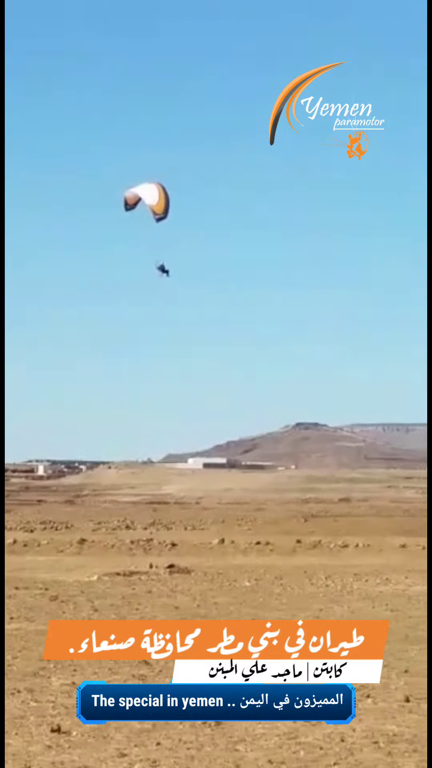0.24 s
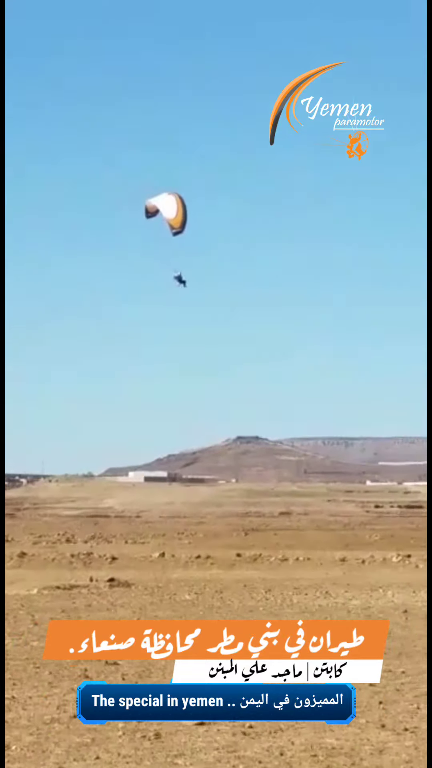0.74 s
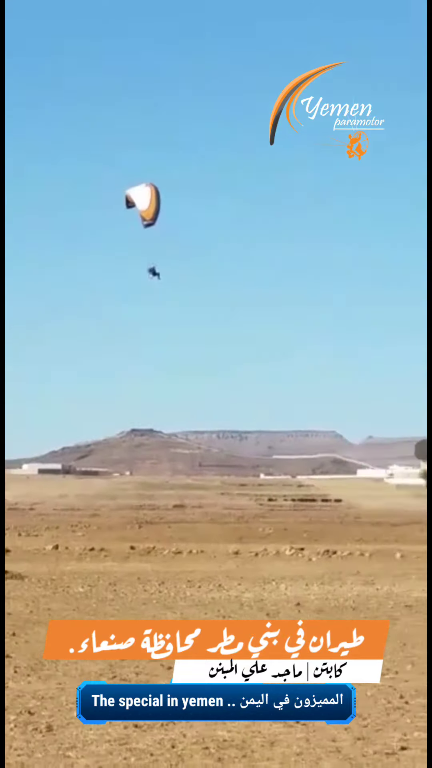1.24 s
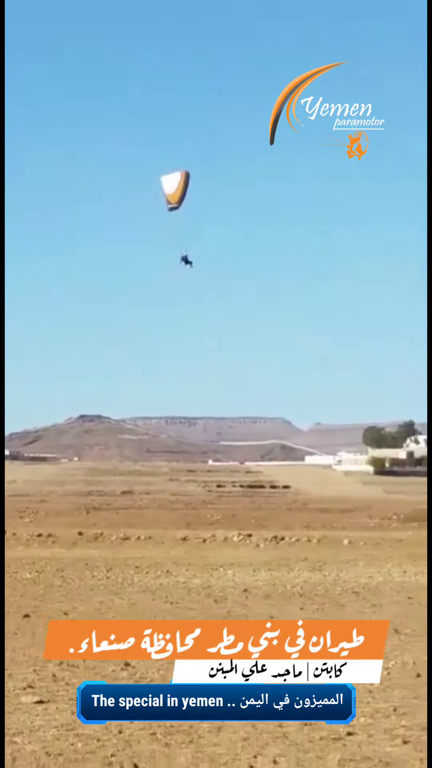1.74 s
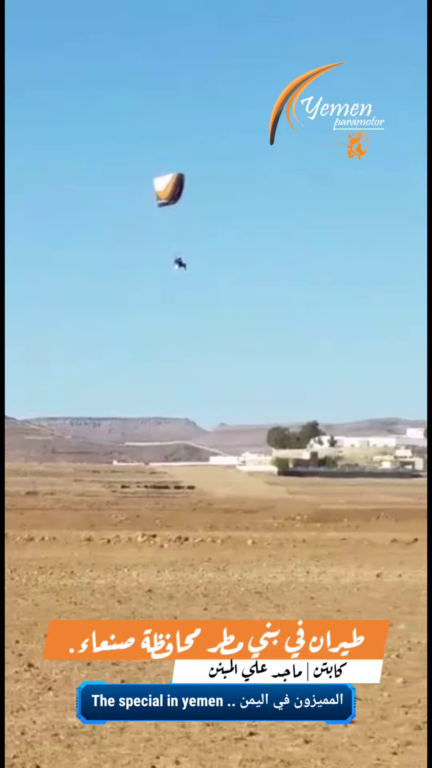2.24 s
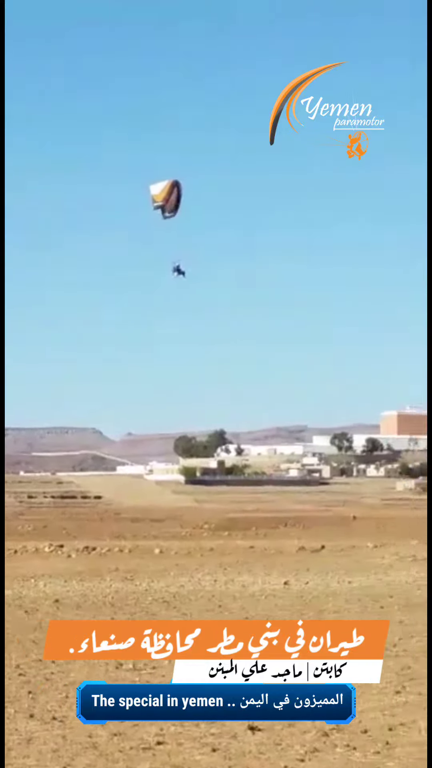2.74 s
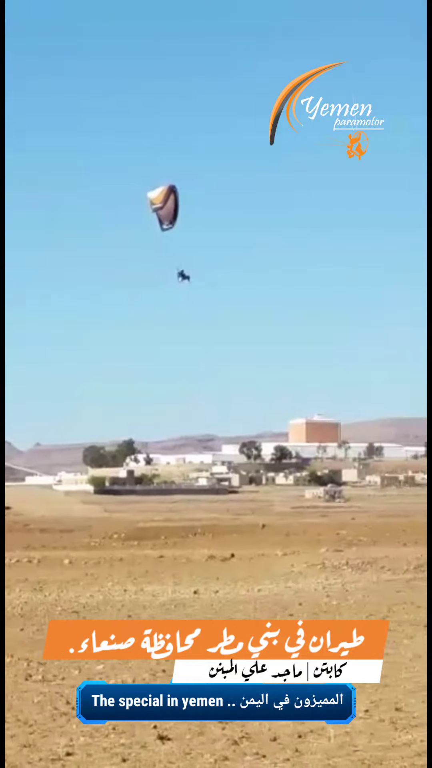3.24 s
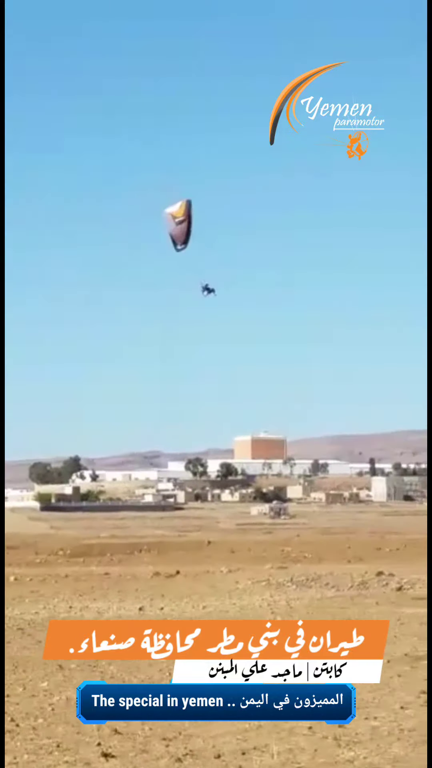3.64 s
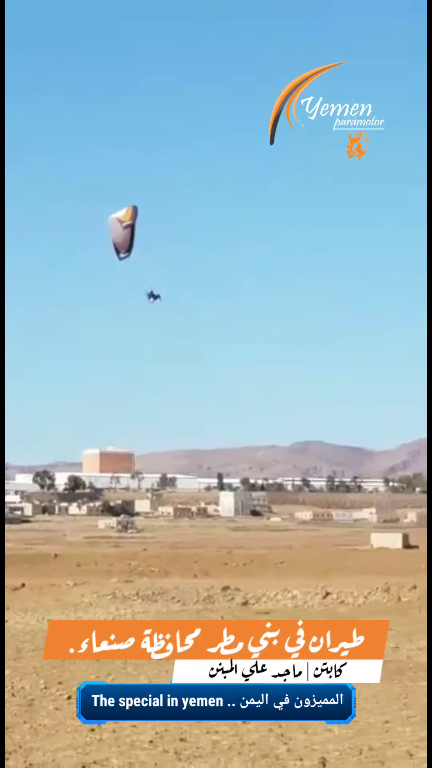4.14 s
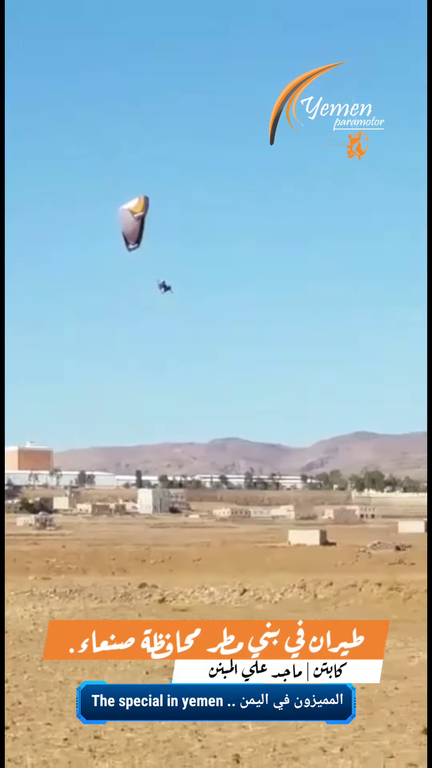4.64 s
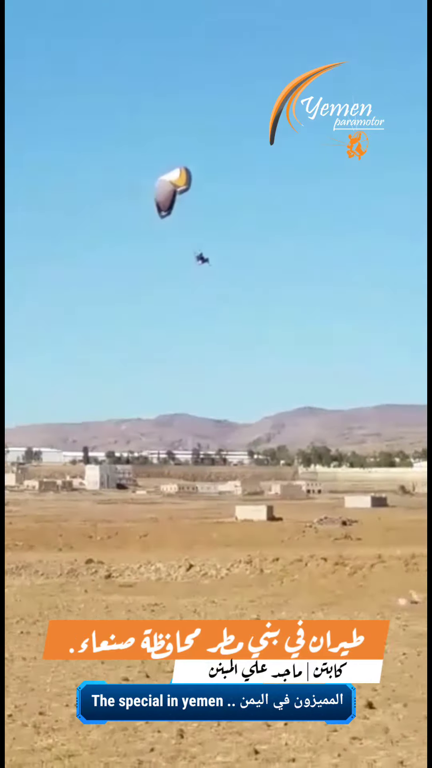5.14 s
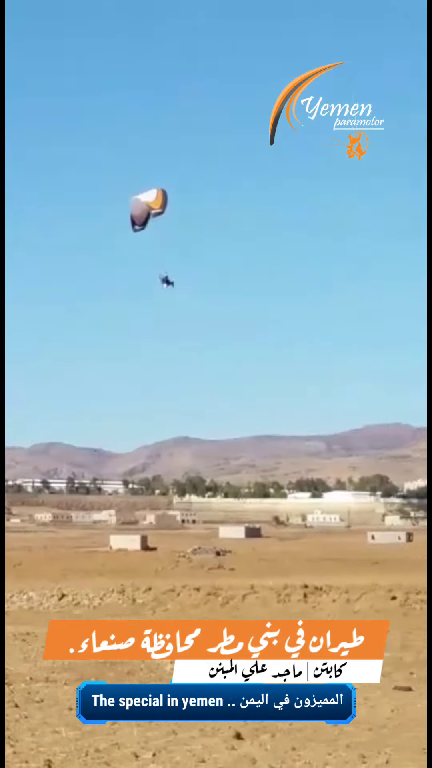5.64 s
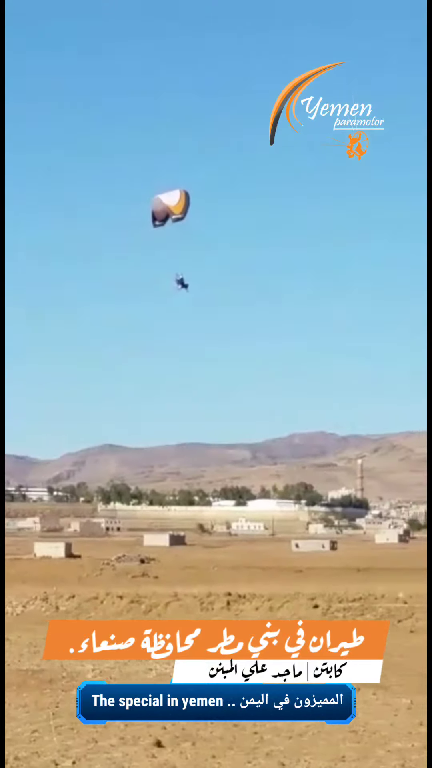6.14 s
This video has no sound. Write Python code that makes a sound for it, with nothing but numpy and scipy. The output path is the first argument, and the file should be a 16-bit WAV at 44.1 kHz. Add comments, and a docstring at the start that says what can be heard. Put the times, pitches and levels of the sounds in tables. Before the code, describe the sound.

Outdoors on open ground, a powered paraglider circles at a distance, its small engine and propeller giving a steady, raspy, fluttering drone. Wind hits a handheld stereo microphone hard on the right side, with dense thumps and flicks at first, scattered bumps in the middle, and a strong burst just before five seconds. The last second is mostly clear engine buzz.

```python
"""A powered paraglider circles over open ground: a two-stroke engine geared down to a two-blade propeller.
Its drone is made of sines at mixtures of blade and firing rates, plus noise that puffs as the blades pass.
Wind thumps on the two microphone ports of a phone, far harder on the right one: filtered noise, short
swings and sharp flicks. The right port also hears an inverted reflection, and faint hiss lies under it all."""
import sys
import numpy as np
from scipy import signal
from scipy.fft import rfft, irfft, next_fast_len
from scipy.io import wavfile
from scipy.ndimage import uniform_filter1d, map_coordinates

SR = 44100
rng = np.random.default_rng(int(sys.argv[2]) if len(sys.argv) > 2 else 0)


def pcm_store(signal):
    """Save signal as 16-bit PCM."""
    levels = np.round(np.clip(np.atleast_2d(signal), -1, 1) * 32767)
    wavfile.write(sys.argv[1], SR, levels.astype(np.int16).T)


N = 282240
T = np.arange(N) / SR  # time in seconds

# Spectrum of the electronic hiss. Each row: frequency in Hz, relative level in dB per Hz.
HISS_SPECTRUM = [(2000, -4.5), (2800, 6.5), (3600, 6.5), (4300, 5.5), (5500, -1), (6200, -21.5),
                 (9800, -34.5), (11500, -4), (13500, 1), (14500, -1)]
# Loudness of the hiss: left and right level in dB.
HISS_LEVELS_DB = [-68.5, -67.5]
# Rising and falling wind on the ports. Each row: time in seconds, left level in dB, right level in dB.
WIND_LEVELS = [(0.0, -30, -9), (0.299, -34, -24.5), (0.678, -37, -18.5), (0.945, -35.5, -16.5),
               (1.251, -41, -17.5), (1.521, -33, -24), (1.84, -38.5, -27.5), (2.002, -36, -22),
               (2.4, -45, -24.5), (2.898, -33.5, -19), (3.338, -34, -20), (3.462, -32.5, -26),
               (3.984, -32.5, -26.5), (4.241, -28.5, -22), (4.481, -37, -30.5), (4.581, -44.5, -39),
               (4.842, -34.5, -18.5), (5.281, -29.5, -24.5), (5.378, -30.5, -33), (5.801, -34, -27.5),
               (5.949, -34, -42.5), (6.4, -43.5, -40.5)]
# Spectrum of wind on the left port. Each row: frequency in Hz, relative level in dB per Hz.
LEFT_WIND_SPECTRUM = [(20, -12), (55, -3), (100, 0), (150, -6), (250, -25), (500, -46), (2000, -90)]
# Spectrum of wind on the right port. Each row: frequency in Hz, relative level in dB per Hz.
RIGHT_WIND_SPECTRUM = [(20, -27), (60, 6), (110, 6.5), (200, -1.5), (320, -10), (420, -23), (550, -23.5),
                       (900, -37.5), (2000, -84.5)]
# Short gusts on the left port. Each row: time of the crest in seconds, level in dB.
LEFT_GUST_EVENTS = [(0.0, -44.5), (0.49, -28), (2.28, -32.5), (2.92, -34), (3.26, -32), (4.88, -25.5),
                    (5.66, -29), (6.38, -35.5)]
GUST_S, FLURRY_S = 0.017, 0.021  # seconds from the crest until the power falls to 1/e
FLURRY_DB = -15  # flurry of eddies round each right bump, relative to the bump's level
# Sharp flicks across the port edge. Each row: time of the onset in seconds, level in dB before the port gain.
FLICK_EVENTS = [(0.026, -10), (0.081, -39), (0.368, -28), (0.421, -23.5), (0.475, -19), (0.588, -23.5),
                (0.64, -27), (0.686, -23.5), (0.754, -25), (0.83, -30), (0.951, -20.5), (0.977, -19),
                (1.065, -21), (1.193, -23.5), (1.254, -27), (1.355, -23), (1.462, -27), (1.545, -28),
                (1.673, -23), (1.752, -35), (2.171, -32), (2.777, -28), (3.052, -28), (3.16, -29),
                (4.817, -29), (4.898, -25), (5.016, -31), (5.274, -30)]
# Gain of the flicks on the ports: left and right gain in dB.
FLICK_PORT_GAINS_DB = [-19.5, 3.5]
FLICK_HZ, FLICK_S = 390, 0.0014  # pitch, and width (standard deviation) in seconds
# Hardest bumps of wind. Each row: time of the middle in seconds, level in dB before the membrane stiffens,
# pitch at the middle in Hz, port (0 left, 1 right).
BUMP_EVENTS = [(0.028, -1.5, 217, 1), (0.045, -8.5, 150, 1), (0.094, -10, 240, 1), (0.169, -11, 115, 1),
               (0.232, -5.5, 111, 1), (0.408, -6.5, 116, 1), (0.438, -13, 144, 1), (0.473, -16.5, 91, 0),
               (0.482, -8.5, 165, 1), (0.502, -12.5, 97, 0), (0.512, -6, 138, 1), (0.53, -8, 192, 1),
               (0.536, -18, 98, 0), (0.597, -10, 216, 1), (0.615, -13.5, 121, 0), (0.652, -8, 181, 1),
               (0.757, -8.5, 158, 1), (0.781, -10.5, 153, 1), (0.835, -15, 163, 1), (0.862, -9.5, 132, 1),
               (0.877, -9, 149, 1), (0.916, -10, 118, 1), (0.939, -11.5, 134, 1), (0.962, -9.5, 149, 1),
               (0.993, -4.5, 128, 1), (1.039, -10, 132, 1), (1.069, -5.5, 183, 1), (1.101, -14, 131, 1),
               (1.157, -12, 119, 1), (1.173, -8.5, 139, 1), (1.201, -11.5, 162, 1), (1.229, -9, 203, 1),
               (1.254, -6.5, 180, 1), (1.33, -11, 204, 1), (1.463, -9.5, 147, 1), (1.577, -7, 148, 1),
               (1.675, -6.5, 192, 1), (1.771, -6.5, 144, 1), (1.965, -10.5, 144, 1), (2.026, -9.5, 105, 1),
               (2.121, -6.5, 153, 1), (2.169, -6.5, 139, 1), (2.185, -7.5, 145, 1), (2.237, -2, 130, 1),
               (2.543, -6.5, 136, 1), (2.638, -8, 142, 1), (2.774, -8.5, 118, 1), (2.794, -8, 154, 1),
               (2.842, -9, 119, 1), (2.893, -11.5, 161, 1), (2.972, -7.5, 125, 1), (3.06, -12, 142, 1),
               (3.149, -7.5, 110, 1), (3.163, -19, 100, 0), (3.2, -6.5, 125, 1), (3.221, -13, 149, 1),
               (3.227, -18, 100, 0), (3.258, -9, 115, 1), (3.273, -20, 117, 0), (3.294, -17.5, 131, 1),
               (3.325, -11, 144, 1), (3.524, -23, 114, 0), (3.609, -5, 143, 1), (4.104, -10.5, 167, 1),
               (4.131, -19, 127, 1), (4.422, -18, 123, 0), (4.431, -8, 127, 1), (4.546, -17.5, 94, 0),
               (4.658, -19, 109, 0), (4.825, -5, 158, 1), (4.853, -6.5, 124, 1), (4.855, -18, 118, 0),
               (4.875, -10, 149, 1), (4.903, 2.5, 130, 1), (4.926, -9.5, 120, 1), (4.965, -5, 121, 1),
               (5.024, -4, 169, 1), (5.05, -3.5, 149, 1), (5.076, -20, 85, 0), (5.078, -16.5, 129, 1),
               (5.126, -8.5, 107, 1), (5.224, -7.5, 153, 1), (5.276, -16, 133, 0), (5.276, -8.5, 175, 1),
               (5.298, -17, 120, 0), (6.178, -13, 132, 1)]

# Colour of the right port. Each row: frequency in Hz, gain over the left port in dB.
RIGHT_PORT_GAIN = [(90, 4), (300, 3.5), (480, -1.5), (720, 3), (860, -3), (950, -7.5), (1200, 6), (1350, 6),
                   (1470, -15.5), (1700, 6.5), (2000, 7), (2500, 5.5), (2900, 2), (3500, 1), (3780, 1),
                   (3950, 6.5), (4100, -1), (4350, -11), (5500, -0.5)]
RIGHT_LATE_S = 4.5e-5  # the right port lies a finger's width further off
ECHO_S = .00216  # delay of the inverted reflection at the right port
# Strength of that reflection. Each row: frequency in Hz, share of the direct sound.
REFLECTION_SHARE = [(600, 0), (950, .45), (1400, .15), (1900, .1), (2400, .15), (2750, .55), (4000, .65),
                    (4300, 0)]
# Air noise that only the right port hears. Each row: frequency in Hz, gain in dB.
RIGHT_OWN_AIR = [(500, -4), (1200, 0), (2500, -1), (4000, -1.5)]
EDGE_HZ = 14550  # upper limit of the sound

# Centres of the three air bands: roar, rasp and sizzle in Hz.
AIR_CENTRES_HZ = (700, 2000, 3350)
# Treble of the torn air on its way through moving air.
# Each row: time in seconds, relative rasp level in dB, relative sizzle level in dB.
RASP_SIZZLE = [(0.0, -44, -52.5), (0.16, -48.5, -65), (0.5, -51, -64.5), (0.7, -58.5, -71),
               (0.86, -52, -75), (0.96, -46.5, -71), (1.05, -48.5, -68.5), (1.15, -45, -61.5),
               (1.25, -46.5, -56), (1.33, -48, -58), (1.42, -54.5, -58.5), (1.53, -42, -64),
               (1.64, -42, -55), (1.8, -45, -52.5), (1.95, -50.5, -64.5), (2.24, -45.5, -58.5),
               (2.4, -51.5, -60.5), (2.56, -41, -64), (2.72, -56, -63.5), (2.83, -50, -66),
               (2.93, -40.5, -54.5), (3.0, -43.5, -55.5), (3.1, -40, -50.5), (3.24, -47, -55.5),
               (3.36, -49.5, -65), (3.46, -45, -60.5), (3.55, -41.5, -58.5), (3.7, -48.5, -60),
               (3.88, -45, -63), (4.2, -53.5, -70.5), (4.35, -41.5, -70.5), (4.44, -47, -64),
               (4.64, -43, -55), (4.8, -48, -60.5), (5.08, -37, -49), (5.44, -47.5, -60.5),
               (5.56, -43.5, -55.5), (5.74, -43.5, -56.5), (5.92, -41.5, -55), (6.1, -40, -54),
               (6.4, -49, -53.5)]
# Basic colour of the air noise. Each row: frequency in Hz, relative level in dB per Hz.
AIR_SPECTRUM = [(150, -1.5), (300, 9), (410, -6.5), (650, 12), (820, 6.5), (1030, 5), (1250, -3.5),
                (1600, 3.5), (1800, -1.5), (2100, 1.5), (2450, 0), (2700, -7.5), (3000, -0.5), (3400, -4),
                (3680, -8), (4000, -11.5), (4250, -11.5), (4600, -17.5), (5600, -27), (6600, -43)]
# Change of that colour as the wing turns.
# Each row: frequency in Hz, change in dB when flying off, when side on, when turned back.
AIR_BY_HEADING = [(900, -3, -1, 0), (1200, 0, 1.5, -1), (1500, -2, -1.5, -1), (1740, 0, 1.5, 1),
                  (2000, 2.5, -1.5, 0.5), (2130, -1, 3.5, 0), (2700, -2, -1.5, -1.5), (2890, 4.5, 3.5, 2.5),
                  (3050, -7, -4, -5), (3500, 2, 0, 3.5), (3650, -2.5, -2.5, -1), (3840, -1.5, -6, -0.5),
                  (4020, -4.5, 3.5, 0.5), (4100, -0.5, 1.5, 0), (4250, 2.5, 3.5, 1.5), (4700, 0, -2.5, 0),
                  (5630, -3.5, 2, 4)]
# Air noise that repeats every turn. Each row: frequency in Hz, share of the power.
REPEATING_SHARE = [(900, 0), (1700, .25), (2050, .4), (2500, .25), (4100, .45), (4400, 0)]
RENEW_PER_S = 7  # new patterns per second
# Times at which the wing swings through its four headings, in seconds.
HEADING_TIMES_S = (1.2, 2.8, 4.9, 6.0)
# Propeller speed as heard on the ground. Each row: time in seconds, blade passes in Hz.
PASS_RATE = [(0.0, 87.12), (0.42, 87.05), (0.6, 87.6), (0.8, 87.42), (1.4, 87.2), (2.0, 87.68),
             (2.4, 87.68), (2.7, 88.2), (3.2, 88.52), (3.8, 88.58), (4.2, 88.41), (5.3, 87.66),
             (6.4, 87.24)]
# Loudness of the craft. Each row: time in seconds, level in dB of the blade-pass tone, level in dB of its octave,
# relative levels in dB of the middle tones, the high tones and the roar of torn air.
FLIGHT_LEVELS = [(0.0, -35, -33, -39.5, -42.5, -53), (0.4, -33, -47.5, -44, -51.5, -45),
                 (0.75, -40, -63, -40, -51, -42.5), (1.05, -31.5, -59, -39, -47, -51.5),
                 (1.35, -32.5, -51, -37.5, -48, -46.5), (1.75, -35, -43.5, -38.5, -46, -45),
                 (2.35, -35.5, -46.5, -47.5, -51.5, -48), (2.8, -33, -42.5, -46.5, -49.5, -44.5),
                 (3.5, -37, -39, -46, -49, -50), (4.15, -32.5, -31.5, -52, -50, -50.5),
                 (4.6, -29.5, -31, -40.5, -44.5, -52.5), (4.95, -29, -30, -41, -43, -46),
                 (5.35, -28, -30, -38.5, -42, -46.5), (5.85, -31, -32.5, -41.5, -46.5, -51),
                 (6.4, -35, -40.5, -40, -45, -42)]
# Firing tones chopped by the blades, and blade tones alone.
# Each row: firing order, blade order, relative level in dB at each of the four headings.
ORDER_TONES = [(0, 3, -7, -3, -5, -7), (0, 4, -14, -10, -12, -11), (0, 5, -17, -12, -20, -19),
               (0, 6, -9, -10, -15, -12), (0, 7, -11, -9, -10, -13), (0, 8, -15, -9, -6, -8),
               (0, 9, -23, -15, -8, -9), (0, 10, -9, -8, -11, -10), (0, 11, -5, -11, -11, -8),
               (0, 12, -8, -14, -8, -10), (0, 13, -14, -16, -19, -16), (0, 14, -20, -19, -22, -23),
               (0, 15, -24, -16, -18, -20), (0, 16, -27, -18, -21, -17), (0, 17, -25, -15, -13, -14),
               (0, 18, -24, -21, -10, -15), (0, 19, -25, -24, -19, -20), (0, 20, -23, -27, -17, -21),
               (0, 21, -20, -20, -22, -20), (0, 22, -26, -19, -24, -22), (0, 23, -19, -19, -18, -24),
               (1, 0, -6, -6, -8, -7), (2, -1, -11, -13, -19, -19), (2, 0, -6, -8, -10, -9),
               (2, 1, -8, -10, -14, -16), (2, 2, -13, -13, -13, -12), (2, 3, -18, -16, -14, -12),
               (3, 0, -14, -19, -14, -14), (3, 1, -20, -11, -10, -9), (3, 2, -15, -15, -7, -7),
               (3, 3, -14, -15, -13, -11), (3, 4, -25, -23, -22, -19), (3, 5, -18, -19, -20, -16),
               (4, 0, -18, -19, -12, -13), (4, 2, -21, -26, -31, -19), (4, 5, -14, -23, -16, -15),
               (5, 0, -20, -17, -14, -12), (5, 2, -14, -24, -17, -16), (5, 3, -13, -14, -16, -11),
               (5, 6, -20, -27, -19, -18), (6, 0, -12, -10, -12, -9), (7, 0, -9, -10, -5, -8),
               (8, 0, -15, -13, -31, -17), (9, 0, -19, -21, -11, -14), (10, 0, -17, -28, -10, -12),
               (11, 0, -18, -16, -10, -13), (12, 0, -17, -13, -12, -16), (13, 0, -21, -21, -17, -24),
               (14, 0, -20, -20, -18, -19), (15, 0, -28, -17, -21, -21), (16, 0, -24, -24, -23, -19),
               (20, 0, -39, -35, -30, -31), (23, 0, -39, -36, -34, -34)]
FIRINGS_PER_PASS = 1.71879  # gearbox ratio over two blades
BURST_LEAD = .2  # the rough burst comes this share of a pass before the pressure rise
THIRD_LAG = 1.3  # radians by which the third blade order trails, which peaks the crest


def gain_of(db):
    """Turns dB into a factor."""
    return 10 ** (np.asarray(db) / 20)


def evened(x):
    """Scales a signal to rms 1."""
    return x / np.sqrt(np.mean(x ** 2) + 1e-20)


def read(points, hz):
    """Reads a table of (Hz, value) along a logarithmic frequency scale."""
    f, value = np.transpose(points)
    return np.interp(np.log(hz + 1), np.log(f + 1), value)


def curves(rows, at):
    """Joins the rows of a table by lines, giving one curve for each column after the first."""
    places, *columns = np.transpose(rows)
    return [np.interp(at, places, column) for column in columns]


def colour(x, points, response=None):
    """Filters a sound by a spectrum in dB, and by one more response if given."""
    size = next_fast_len(N + 8192)
    hz = np.fft.rfftfreq(size, 1 / SR)
    gain = gain_of(read(points, hz))
    if response is not None:
        gain = gain * response(hz)
    padded = np.pad(x, 4096, "reflect")
    return irfft(rfft(padded, size) * gain, size)[4096:N + 4096]


def drift(top_hz):
    """Slow chance of rms near 1: two rows of random values joined by lines."""
    knots = rng.standard_normal((2, 400))
    at = np.arange(400)
    slow = np.interp(T * top_hz, at, knots[0])
    quick = np.interp(T * top_hz * 2.7, at, knots[1])
    return slow + 0.52 * quick


def swells(events, width_s):
    """Power of bell-shaped swells, one for each event's time and dB."""
    return sum(gain_of(2 * db) * np.exp(-((T - s) / width_s) ** 2) for s, db, *_ in events)


def hiss():
    """Faint noise of the microphone electronics, separate in each channel."""
    return np.array([gain_of(db) * evened(colour(rng.standard_normal(N), HISS_SPECTRUM))
                     for db in HISS_LEVELS_DB])


def wind(per_s=150, spread_db=1.5, steady=.6):
    """Eddies strike each port on their own: sparse pushes of varied size over a low rumble."""
    right_bumps = [row for row in BUMP_EVENTS if row[3] > .5]
    left_gusts = swells(LEFT_GUST_EVENTS, GUST_S)
    right_flurries = gain_of(2 * FLURRY_DB) * swells(right_bumps, FLURRY_S)
    spectra = LEFT_WIND_SPECTRUM, RIGHT_WIND_SPECTRUM
    out = []
    for level_db, power, points in zip(curves(WIND_LEVELS, T), (left_gusts, right_flurries), spectra):
        chance, size, rumble = rng.random(N), rng.exponential(1, N), rng.standard_normal(N)
        strikes = (chance < per_s / SR) * np.sign(rumble)
        pushes = strikes * gain_of(spread_db * np.minimum(size, 2))
        strength = np.sqrt(gain_of(2 * level_db) + power)
        flow = strength * evened(evened(pushes) + steady * rumble)
        out.append(colour(flow, points) / np.std(colour(rumble, points)))
    return np.array(out)


def flicks():
    """Wind flicks across the port edge: each is a short wavelet with a bell-shaped swell."""
    out, t = np.zeros(N + 400), np.arange(-200, 200) / SR
    swell = np.exp(-.5 * (t / FLICK_S) ** 2)
    starts = rng.uniform(0, 2 * np.pi, len(FLICK_EVENTS))
    for (s, db), start in zip(FLICK_EVENTS, starts):
        wavelet = swell * np.cos(2 * np.pi * FLICK_HZ * t + start)
        out[round(s * SR):][:len(t)] += gain_of(db) * wavelet
    late = out[20:N + 20]  # the middle comes 4 ms after the onset
    return gain_of(FLICK_PORT_GAINS_DB)[:, None] * late


def bumps(cycles=0.34, glide=0.24, snap_cycles=0.17, snap_db=-9):
    """Each bump is a short swing of the membrane, sliding in pitch, with a sharp crest."""
    out = np.zeros((2, N + 4000))
    t = np.arange(-2000, 2000) / SR
    chances = rng.uniform(-1.2, 1, (len(BUMP_EVENTS), 2))
    for (s, db, hz, port), (start, slide) in zip(BUMP_EVENTS, chances):
        u = t * hz  # time in cycles
        phase = 2 * np.pi * (u + glide * slide * u ** 2) + 2.05 * start
        swing = np.exp(-.5 * (u / cycles) ** 2) * np.cos(phase)
        v = u / snap_cycles
        snap = gain_of(snap_db) * (1 - v ** 2) * np.exp(-.5 * v ** 2)
        out[int(port > .5), round(s * SR):][:len(t)] += gain_of(db) * (swing + snap)
    return out[:, 2000:N + 2000]


def ports(craft, stray):
    """The right port has its own colour, a little delay, a comb from a close reflection and air noise of its own."""
    def path(hz):
        """Subtracts the delayed reflection, then adds the delay between the ports."""
        share = np.clip(read(REFLECTION_SHARE, hz), 0, 1)
        comb = 1 - share * np.exp(-2j * np.pi * hz * ECHO_S)
        return comb * np.exp(-2j * np.pi * hz * RIGHT_LATE_S)
    return np.array([craft, colour(craft + stray, RIGHT_PORT_GAIN, path)])


def repeating(passes, size=1000):
    """The blades tear the air almost alike on every turn: a noise pattern read once a turn, slowly renewed."""
    patterns = rng.standard_normal((40, size + 1))  # used up after about 5.6 s; this part then falls silent
    place = passes / 2 % 1 * size  # two passes make one turn
    age = T * RENEW_PER_S
    old, new = (map_coordinates(patterns, [age.astype(int) + k, place], order=3) for k in range(2))
    fade = np.pi / 2 * (age % 1)
    return evened(np.cos(fade) * old + np.sin(fade) * new)


def air(passes, gates=(.42, .15, .42), uneven=.22, firing=.12):
    """Torn air: noise as roar, rasp and sizzle, puffing at every blade pass, the rasp also at each firing."""
    frames, hz = N // 128 + 1, np.fft.rfftfreq(512, 1 / SR)
    t = np.arange(frames) * 128 / SR
    noises = [rng.standard_normal(N), repeating(passes)]
    fresh, again = signal.stft(noises, nperseg=512, noverlap=384)[2][..., :frames]
    share = read(REPEATING_SHARE, hz)[:, None]
    mixed = np.sqrt(1 - share) * fresh + np.sqrt(share) * again

    # Random patches in time and frequency, 1.5 dB rms.
    grain = rng.standard_normal((frames, 257)).T
    patches_db = 1.5 * evened(uniform_filter1d(uniform_filter1d(grain, 6, 0), 30, 1))
    roar_db = curves(FLIGHT_LEVELS, t)[-1] + 0.73 * np.interp(t, T, drift(6.3))
    bands_db = np.array([roar_db, *curves(RASP_SIZZLE, t)])
    # Each frequency takes its level from the nearest band centres.
    centres = np.log(AIR_CENTRES_HZ)
    blend = np.array([np.interp(np.log(hz + 1), centres, row) for row in np.eye(3)]).T
    facing = np.array([np.interp(t, HEADING_TIMES_S[:3], row) for row in np.eye(3)])
    heading_db = np.array(curves(AIR_BY_HEADING, hz)).T @ facing
    level_db = read(AIR_SPECTRUM, hz)[:, None] + blend @ bands_db + heading_db + patches_db
    spectrum = mixed * gain_of(level_db)

    band = np.digitize(hz, (1450, 2700))[:, None]  # split into roar, rasp and sizzle
    split = [spectrum * (band == k) for k in range(3)]
    # The factor sets the overall level of the air noise.
    parts = signal.istft(split, nperseg=512, noverlap=384)[1][:, :N] * 2.6
    angle = np.pi * (passes + BURST_LEAD)
    firing_puff = firing * np.cos(2 * np.pi * FIRINGS_PER_PASS * passes)
    louder_blade = uneven * np.cos(angle)  # one blade sizzles a little louder
    extras = 0, firing_puff, louder_blade
    return sum(part * evened(np.exp(gate * np.cos(2 * angle) + extra))
               for part, gate, extra in zip(parts, gates, extras))


def tones(passes, fade_db=2.0, shared=.9, own=0.71):
    """Sines at sums of firing and blade orders; turbulent air makes them fade and waver."""
    pass_db, octave_db, middle_db, high_db, _ = curves(FLIGHT_LEVELS, T)
    out = gain_of(pass_db + 0.79 * drift(8.7)) * np.sin(2 * np.pi * passes)
    out += gain_of(octave_db + .8 * drift(9)) * np.sin(4 * np.pi * passes)
    start = rng.random(30)  # starting phase in cycles for each firing order
    start[0] = .5  # blade orders dip together
    start[7] = .1  # the seventh firing order beats slowly against the twelfth blade order
    path = shared * drift(5)  # the path length trembles for all tones at once
    for firing, blade, *heading_db in ORDER_TONES:
        order = firing * FIRINGS_PER_PASS + blade
        group_db = middle_db if order < 10 else high_db
        level_db = group_db + np.interp(T, HEADING_TIMES_S, heading_db)
        waver = order / 10 * (path + own * drift(6))  # short waves feel the eddies more
        lag = THIRD_LAG * (order == 3)
        phase = 2 * np.pi * (order * passes + blade * BURST_LEAD + start[round(firing)]) + waver - lag
        out += gain_of(level_db + fade_db * drift(7)) * np.cos(phase)
    return np.sqrt(2) * out  # sine levels are rms


def scene():
    """Adds the craft as both ports hear it, the wind on the membranes and the hiss."""
    passes = np.cumsum(curves(PASS_RATE, T)[0]) / SR  # blade passes so far
    craft = tones(passes) + air(passes)
    push = wind() + bumps() + flicks()
    buffet = .95 * np.tanh(push / .95)  # the membrane stiffens at large swings
    stray = colour(air(passes), RIGHT_OWN_AIR)
    return ports(craft, stray) + buffet + hiss()


def record(dry):
    """Cuts everything above the band limit."""
    taps = signal.firwin(511, EDGE_HZ, window=("kaiser", 9), fs=SR)
    padded = np.pad(dry, ((0, 0), (255, 255)), "reflect")
    return signal.oaconvolve(padded, taps[None], "valid")


dry = scene()
out = record(dry)
pcm_store(out)
```